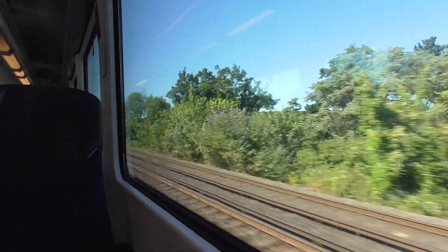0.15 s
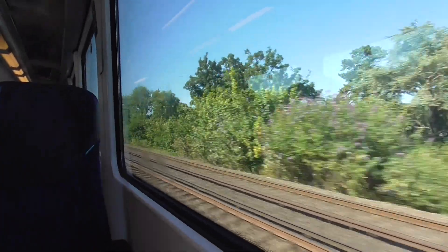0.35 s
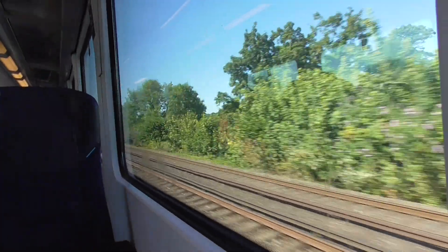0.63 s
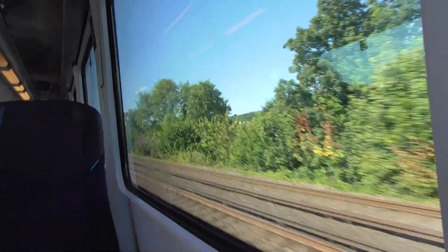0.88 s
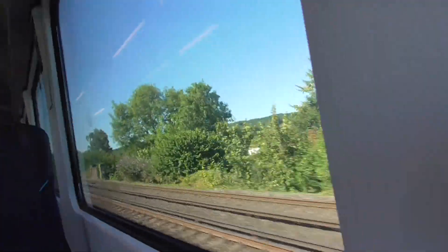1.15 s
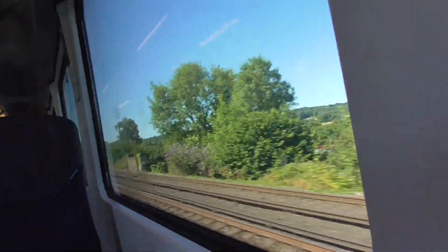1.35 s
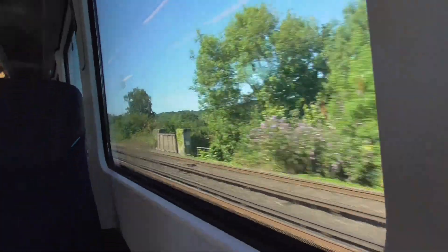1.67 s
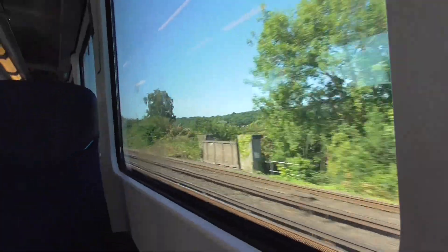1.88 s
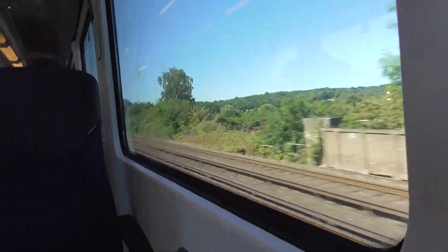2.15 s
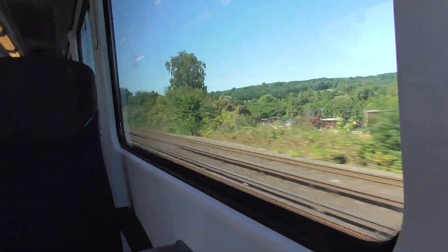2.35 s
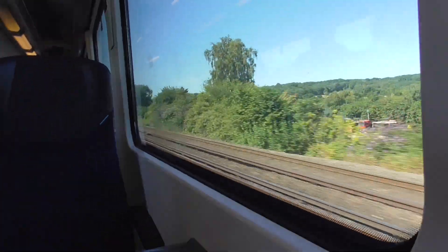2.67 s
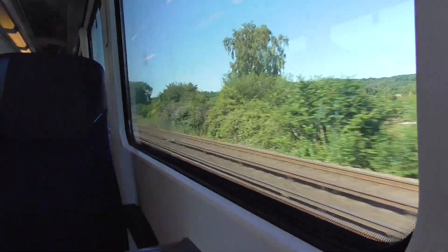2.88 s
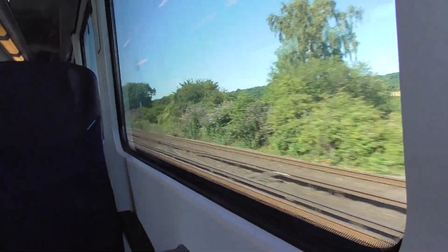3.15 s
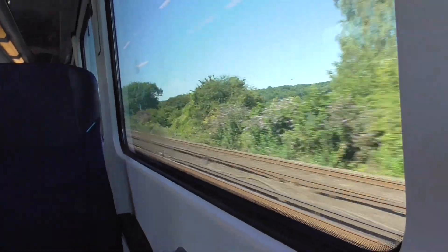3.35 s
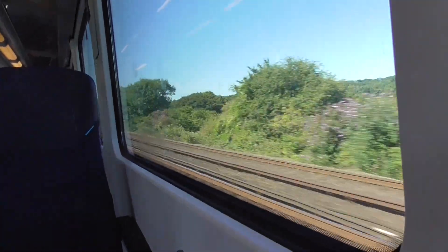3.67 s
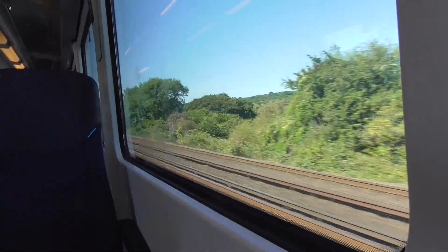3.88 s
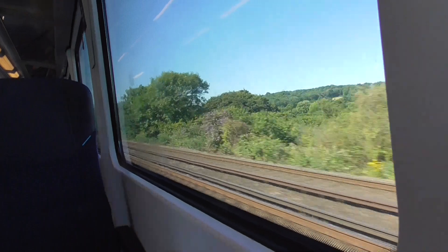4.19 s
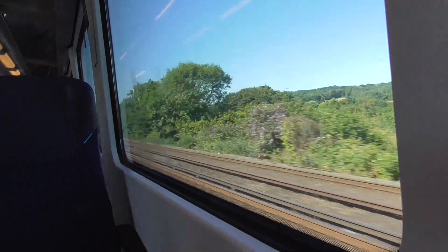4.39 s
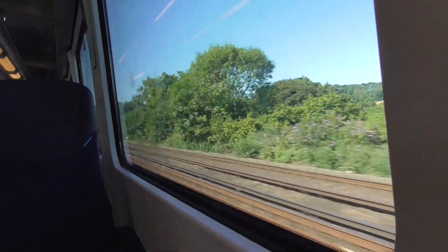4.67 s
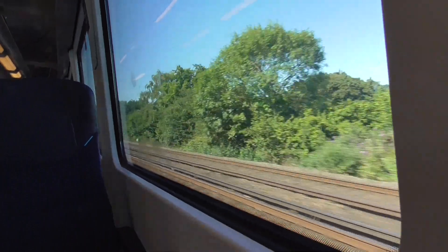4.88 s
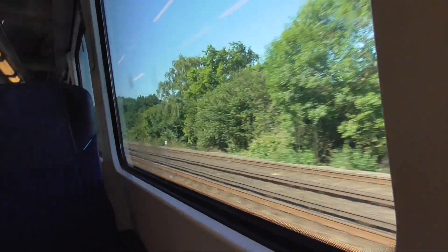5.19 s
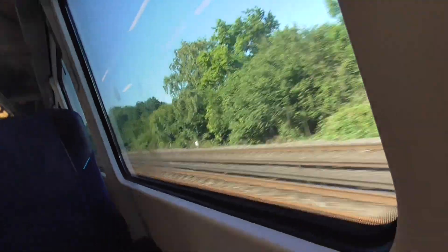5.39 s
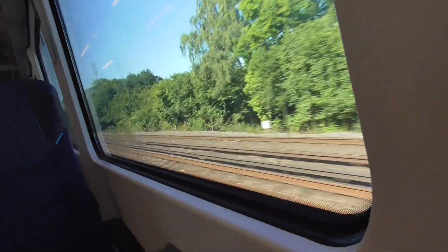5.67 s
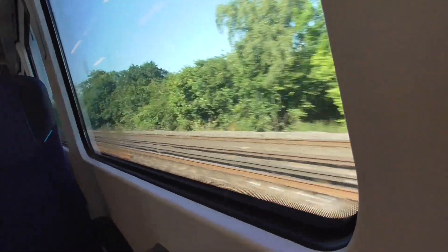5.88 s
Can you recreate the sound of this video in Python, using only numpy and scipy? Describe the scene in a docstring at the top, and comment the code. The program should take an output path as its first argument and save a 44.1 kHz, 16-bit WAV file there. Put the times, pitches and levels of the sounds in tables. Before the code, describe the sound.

Inside a moving passenger train, the wheels make a steady, muffled roar while the floor and wall panels rumble with irregular low bumps. The motors hold an even whine over a soft hiss of air, and the wheels ring faintly at times. Light handling noises sit right at the microphone: brief cloth rustles, finger scuffs and two small plastic clicks. The train keeps the same speed throughout.

```python
"""A deep, jolting rumble and a steady roar: an electric train at speed, heard from a window seat.
The roughness of the welded rail shakes floor and wall panels and sets rails and wheels ringing.
The electrics whine on fixed notes, the gears sing under load and air hisses from the vents.
Close by, a sleeve rustles, fingers scuff and plastic ticks as a phone is turned in the hand."""
import sys
import numpy as np
from scipy import signal
from scipy.fft import rfft, irfft
from scipy.io import wavfile
from scipy.ndimage import uniform_filter1d

SR = 44100
rng = np.random.default_rng(int(sys.argv[2]) if len(sys.argv) > 2 else 0)


def wav_out(sig):
    """Save sig, one row per channel (or a flat mono array), as 16-bit PCM at SR to the path in sys.argv[1]."""
    wavfile.write(sys.argv[1], SR, np.round(np.clip(np.atleast_2d(sig).T, -1, 1) * 32767).astype(np.int16))


N = 266506
TIME = np.arange(N) / SR
FREQ = np.maximum(np.arange(N // 2 + 1) * SR / N, 1)


def coach():
    """Rough spots jolt the wall panels, dips set the floor booming, and the body sways below both."""
    # broad colour of each vibration: f/Hz, level/dB
    panel_colour = [(60, -43), (90, -8), (110, 1), (190, 1), (270, -0.5), (330, -10), (450, -30),
                    (900, -94)]
    floor_colour = [(35, -35), (48, -23), (56, 0.5), (85, 3), (102, -7.5), (135, -38), (300, -71)]
    sway_colour = [(10, -18), (22, -6), (32, 7), (44, -3), (54, 10), (70, -11), (150, -52.5)]
    # resonances: f/Hz, width/Hz, level/dB
    panel_modes = [(130, 8.8, 2.7), (150, 24.6, 3.8), (216.4, 5.1, 2), (231.3, 23, 3.2)]
    floor_modes = [(67.6, 2.5, 12), (79, 6, 3)]
    # blows from the track: t/s, level/dB
    rough_spots = [(.74, -28.5), (.84, -30), (1.25, -27.5), (2.15, -29), (2.28, -28.5), (2.70, -28),
                   (3.40, -24.5), (3.60, -28), (3.84, -30), (4.28, -26), (4.53, -24.5), (4.62, -25.5),
                   (4.91, -29), (5.02, -23.5), (5.37, -26), (5.80, -24.5)]
    dips = [(.03, -32.5), (.66, -26.5), (1.25, -29.5), (2.08, -27.5), (2.67, -29), (2.92, -32), (3.47, -35),
            (3.66, -31), (4.15, -35), (4.35, -41), (4.65, -30.5), (5.06, -28.5), (5.88, -42)]
    panel_power = undb(-27) ** 2 + blows(rough_spots, rise_s=0.01, hold_s=0.044, fall_s=0.024)
    floor_power = undb(-36.5) ** 2 + blows(dips, rise_s=0.027, hold_s=0.016, fall_s=0.15)
    boom = driven(field(structure(floor_colour, floor_modes)), floor_power, window_s=0.12)
    rumble = driven(field(structure(panel_colour, panel_modes)), panel_power, window_s=0.18)
    sway = field(spectra(sway_colour)[0]) * undb(-48.5)
    return rumble + undb(-0.75) * boom + sway


def rolling():
    """Steel rolls on steel: rails roar and wheels ring, muffled by floor and glass."""
    # broad colour at the seat: f/Hz, level/dB
    rail_colour = [(150, -43), (260, 2), (320, 9.5), (400, 6), (470, 3.5), (530, -1), (750, -3.5),
                   (920, -6.5), (1120, -11), (1350, -12), (1500, -19), (1750, -27.5), (2600, -34),
                   (6000, -82)]
    wheel_colour = [(1200, -53), (1800, -9), (2000, 2.5), (2350, -1), (2550, -7.5), (2900, -24),
                    (5000, -50)]
    # resonances: f/Hz, width/Hz, level/dB
    rail_modes = [(648, 14, 4.5), (991, 20.5, 2.5), (1046, 33, -6)]
    wheel_modes = [(1935, 50, 1), (2200, 160, -8)]
    # rail roughness, heard as the strength of the roar: t/s, level/dB
    roughness = [(0, -34.5), (.6, -33), (1.4, -34), (1.95, -32.5), (3.2, -32.5), (4.35, -33.5), (5.0, -33),
                 (5.7, -33.5), (6.04, -33.7)]
    # ringing near 2 kHz swells from the wheels; the short burst at 2.555 s is part of a finger scuff:
    # t/s, level/dB, rise/s, fall/s
    ring_swells = [(.65, -65, .5, .4), (2.19, -53, 0.16, .03), (2.555, -52.5, 0.034, .06),
                   (4.52, -59, .12, .15), (4.9, -64, .1, .06), (5.25, -62, .12, .2)]
    roar = field(structure(rail_colour, rail_modes)) * undb(curves(roughness)[0] + 0.5 * walk(3.3))
    ring_power = undb(-58.5) ** 2 + swells(ring_swells)
    ring = field(structure(wheel_colour, wheel_modes)) * np.sqrt(ring_power) * undb(0.24 * walk(21))
    return roar + ring


def traction(whine_hz=430.9, mesh_hz=701):
    """Motors and converter hum on steady tones; the gear mesh adds a rough note and rings its casing."""
    # main electric whine: t/s, level/dB
    whine_level = [(0, -36.5), (.85, -38), (1.4, -37), (2.15, -34.5), (2.6, -38.5), (3.3, -35),
                   (4.45, -36.5), (6.04, -37.5)]
    # the gears sing louder as they take load: t/s, level/dB
    gear_load = [(0, -53), (1.5, -56), (3.3, -51), (4.3, -50), (5.0, -44), (5.35, -46), (5.65, -50.5),
                 (6.04, -43)]
    # gear casing resonances: f/Hz, width/Hz, level/dB
    casing_modes = [(696, 36, 4), (2157, 83, -14)]
    # weaker tones of electrics and drive: f/Hz, level/dB, left minus right/dB, flutter/dB
    hums = [(68.6, -44, 0, 2.5), (274.5, -47.5, -2, 2), (838, -60, -2, 2), (862, -63, 0, 2),
            (970.5, -57.5, 6, 2), (1406, -68, 0, 2)]
    whine = tone(whine_hz, curves(whine_level)[0], pan_db=-4.0, flutter_db=1.5, wobble_rad=0.24)
    gear_db = curves(gear_load)[0]
    mesh = tone(mesh_hz, gear_db - 7.5, pan_db=-13, flutter_db=4.5, wobble_rad=1.0)
    casing = field(sum(undb(db) * abs(resonance(hz, width)) ** 2 for hz, width, db in casing_modes))
    return whine + mesh + casing * undb(gear_db) + sum(tone(*row) for row in hums)


def handling():
    """A sleeve slides in fine-grained strokes; fingers give the case short, soft scuffs."""
    # colour of sliding cloth, and the dulling by soft fingertips: f/Hz, level/dB
    cloth_colour = [(1200, -22), (2600, -4.5), (4200, 0.5), (6000, -4.5), (8000, 0.5), (10200, -1),
                    (12500, -6.5), (15500, -15.5)]
    fingertip = [(10000, -2), (13000, -2), (15500, -10)]
    # sleeve strokes: t/s, level/dB, rise/s, fall/s
    strokes = [(.38, -57, .12, 0.082), (.59, -62, .05, .06), (1.11, -55.5, .11, 0.19),
               (1.26, -60, 0.065, 0.14), (2.5, -61.5, 0.38, 0.26), (3.13, -57, 0.055, 0.079),
               (3.29, -59.5, 0.091, .06), (5.17, -56.5, 0.065, 0.066), (5.28, -53.5, 0.091, 0.095),
               (5.47, -58, .03, .05), (5.62, -62, 0.16, 0.27), (6.0, -51, 0.12, .09)]
    # finger scuffs: t/s, level/dB, length/s, f/Hz, width/Hz
    scuffs = [(.585, -68, 0.027, 10400, 1200), (1.236, -57, .02, 10000, 2000),
              (1.249, -46.5, .006, 7500, 5000), (1.28, -54, .009, 4500, 4000),
              (1.632, -56.5, .03, 8900, 1800), (2.103, -59, .015, 8000, 6000),
              (2.21, -51.5, 0.015, 9000, 8000), (2.52, -54, .035, 9700, 1800),
              (2.549, -46.5, 0.0072, 5460, 6500), (2.56, -49.5, 0.023, 4320, 4000),
              (2.745, -62, .03, 7500, 2500), (3.494, -58, .012, 7000, 3000),
              (4.512, -57, 0.022, 3800, 3000), (5.553, -56, 0.021, 5500, 2000)]
    out = field(spectra(cloth_colour)[0]) * np.sqrt(swells(strokes)) * undb(1.1 * walk(90))
    soft = spectra(fingertip)[0]
    for s, db, length, hz, width in scuffs:
        envelope = np.exp(-2 * ((TIME - s) / length) ** 2)
        out += field(soft * abs(resonance(hz, width)) ** 2) * envelope * undb(db)
    return out


def ticks():
    """Plastic snaps: a sharp release and a brief chatter ring a few short, high resonances."""
    # snaps: t/s, peak level/dB, pitch ratio to the modes, chatter t60/s, contact cutoff/Hz
    snaps = [(1.8494, -21, 1.01, 0.0067, 15000), (4.461, -33, 1.1, 0.011, 9500)]
    # resonances of the plastic: f/Hz, width/Hz, level/dB
    modes = [(4500, 1400, -15.5), (7900, 810, -0.5), (9770, 2100, 1.5), (12000, 1300, -14),
             (14800, 1200, -3)]
    out = 0
    for s, db, pitch, t60, contact_hz in snaps:
        decay = (TIME >= s) * undb(-60 * np.maximum(TIME - s, 0) / t60)
        push = decay * rng.standard_normal((2, N))
        push[:, int(s * SR)] += 6  # the release
        body = sum(undb(mode_db) * resonance(pitch * hz, width) ** 2 for hz, width, mode_db in modes)
        snap = irfft(rfft(push) * body / (1 + (FREQ / contact_hz) ** 4), N)
        out = out + undb(db) * snap / abs(snap).max(axis=1, keepdims=True)
    return out


def vents():
    """Air leaves the vents in a smooth bed of hiss."""
    # colour of the airflow: f/Hz, level/dB
    air_colour = [(1200, -4), (2800, 0.5), (4300, 1.5), (6200, -2), (7600, -2), (8800, -4.5), (10300, -6),
                  (12500, -11.5), (15500, -21)]
    return field(spectra(air_colour)[0]) * undb(-58 + 0.27 * walk(4.5))


def tone(hz, db, pan_db, flutter_db, wobble_rad=0.092):
    """A machine note whose level and phase flutter as the coach vibrates."""
    phase = 2 * np.pi * (hz * TIME + rng.random()) + wobble_rad * walk(5.5)
    note = np.sqrt(2) * np.sin(phase) * undb(db + flutter_db * walk(4.5))
    return note * undb(np.array([[pan_db], [-pan_db]]) / 2)


def field(gain):
    """Coloured stereo noise, rms 1 in mono: narrow in the bass, diffuse in the treble."""
    # stereo image: f/Hz, side minus mid/dB, left minus right/dB
    image = [(60, -22, 0.5), (150, -30, -0.8), (350, -15, -2), (523, -10.5, -4), (800, -6, 0.5),
             (1010, -12, 2.5), (1340, -4.5, -1), (2100, -6.5, -1), (4700, -5.5, -1.1), (8600, 1, -1),
             (12500, 0, -6.5)]
    spread, balance = spectra(image)
    mid, side = rfft(rng.standard_normal((2, N)))
    left = (mid + spread * side) * np.sqrt(balance)
    right = (mid - spread * side) / np.sqrt(balance)
    y = irfft(np.array([left, right]) * gain, N)
    return y / y.mean(axis=0).std()


def structure(colour, modes):
    """Gain of a part of the train: a broad colour with resonances standing out of it."""
    peaks = sum(undb(db) ** 2 * abs(resonance(hz, 1.5 * width)) ** 4 for hz, width, db in modes)
    return np.sqrt(spectra(colour)[0] ** 2 + peaks)


def resonance(hz, width):
    """Complex response of one resonance, gain 1 at its centre."""
    return 1 / (1 + 1j * (FREQ / hz - hz / FREQ) * hz / width)


def driven(x, power, window_s):
    """The slow level of a vibration follows the power that drives it; the fast beating stays its own."""
    own_power = uniform_filter1d(x.mean(axis=0) ** 2, int(window_s * SR) + 1)
    return x * np.sqrt(power / own_power)


def blows(table, rise_s, hold_s, fall_s):
    """Power of a row of blows that each rise, hold and die away."""
    power = 0
    for s, db in table:
        attack = np.clip((TIME - s) / rise_s, 0, 1)
        decay = np.exp(-np.maximum(TIME - s - rise_s - hold_s, 0) / fall_s)
        power += (undb(db) * attack * decay) ** 2
    return power


def swells(table):
    """Power of a row of swells that each rise to a peak and fade."""
    power = 0
    for s, db, rise, fall in table:
        from_peak = (TIME - s) / np.where(TIME < s, rise, fall)
        power += (undb(db) * np.exp(-from_peak ** 2)) ** 2
    return power


def walk(rate_hz):
    """Smooth random drift of spread 1, rolling off above rate_hz."""
    y = irfft(rfft(rng.standard_normal(N)) / (1 + (FREQ / rate_hz) ** 4), N)
    return (y - y.mean()) / y.std()


def curves(table):
    """Each column of a table of times, joined by straight lines."""
    s, *columns = np.transpose(table)
    return [np.interp(TIME, s, c) for c in columns]


def spectra(table):
    """Each dB column of a table of frequencies, as gain over the frequency axis."""
    hz, *columns = np.transpose(table)
    return [undb(np.interp(np.log(FREQ), np.log(hz), c)) for c in columns]


def undb(db):
    """Decibels to gain."""
    return 10 ** (np.asarray(db) / 20)


def scene():
    """Everything that reaches the seat."""
    return coach() + rolling() + traction() + vents() + handling() + ticks()


def record(dry, lead_hz=30, top_hz=15800):
    """The right microphone leads in phase in the bass; the top is cut steeply on both sides."""
    lead = np.exp(1j * np.arctan(lead_hz / FREQ))
    pair = np.array([dry[0], irfft(rfft(dry[1]) * lead, N)])
    return signal.sosfilt(signal.ellip(10, .1, 80, top_hz, fs=SR, output="sos"), pair)


dry = scene()
out = record(dry)
wav_out(out)
```